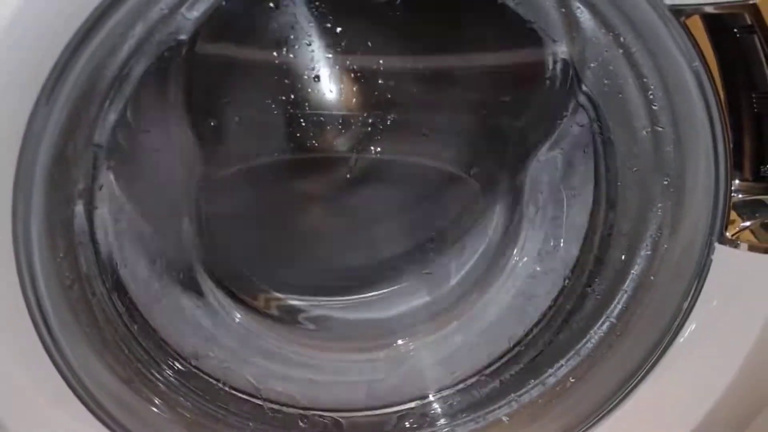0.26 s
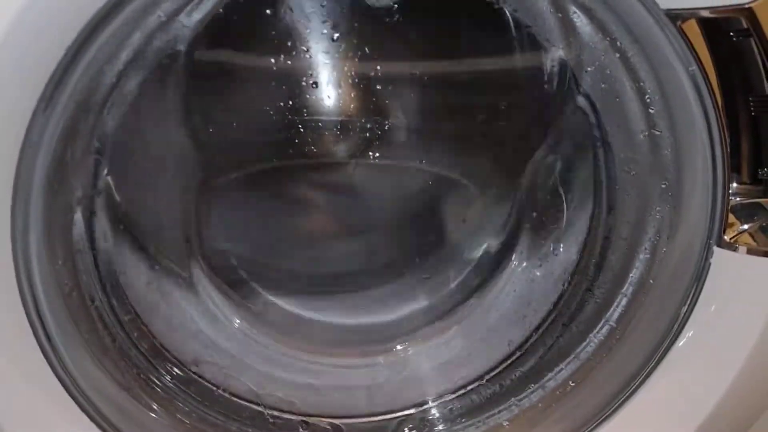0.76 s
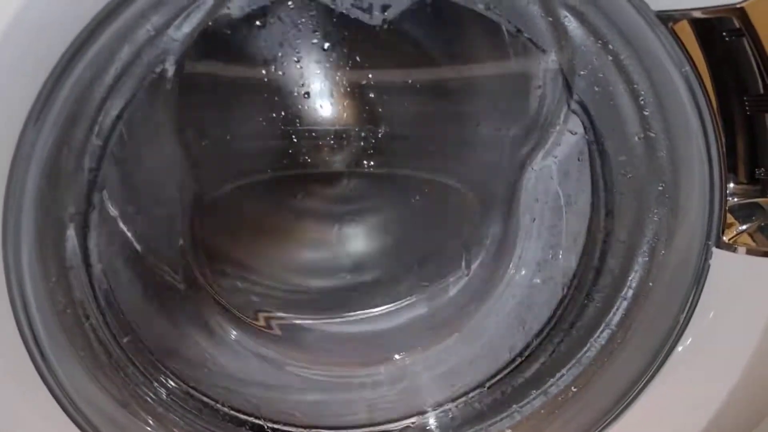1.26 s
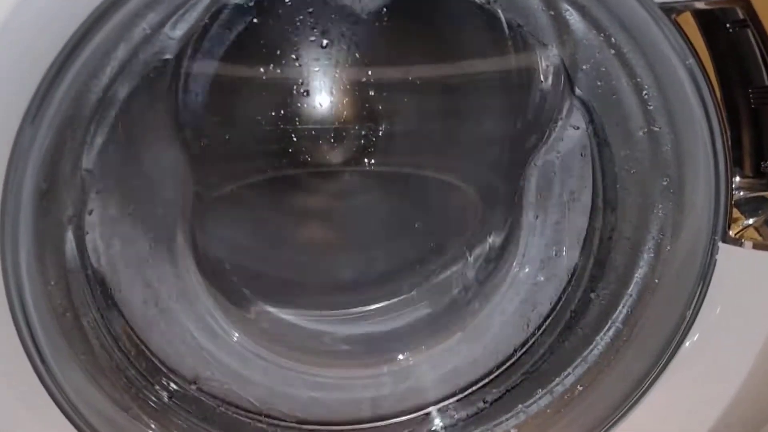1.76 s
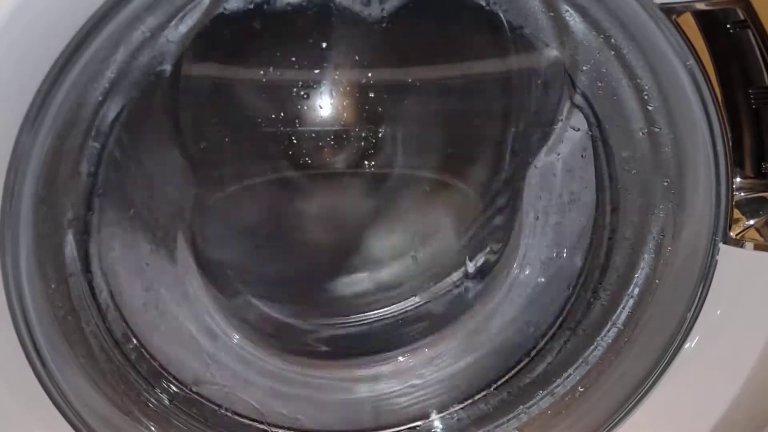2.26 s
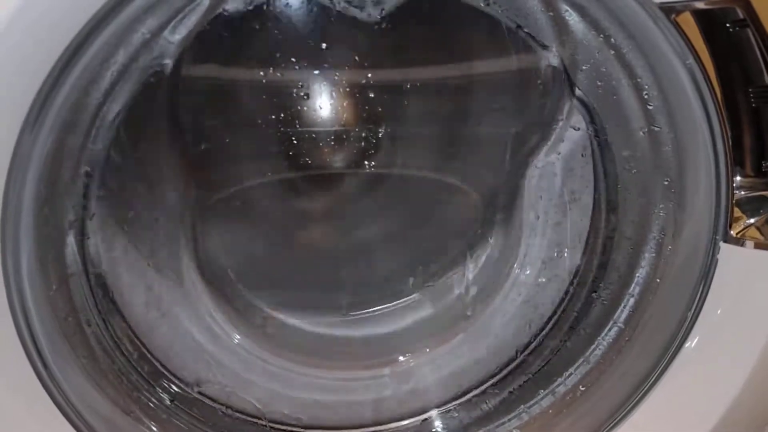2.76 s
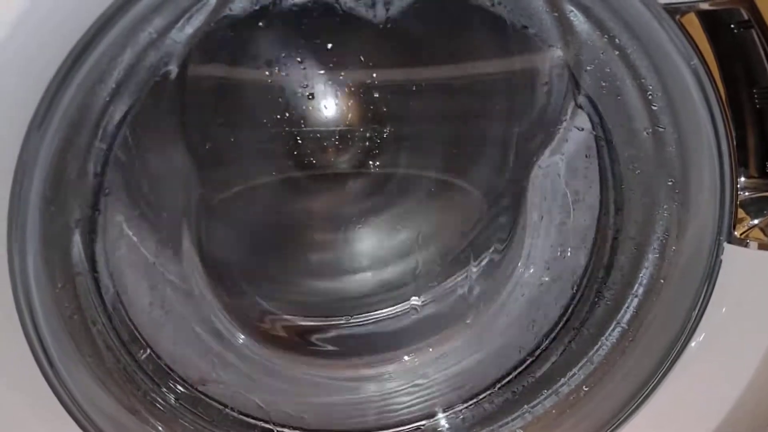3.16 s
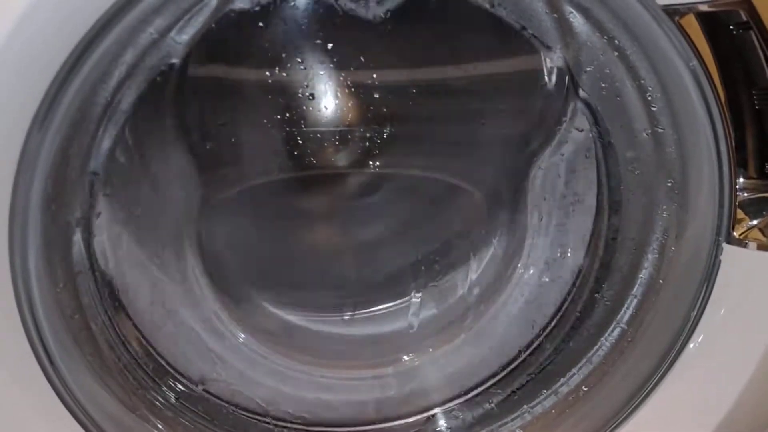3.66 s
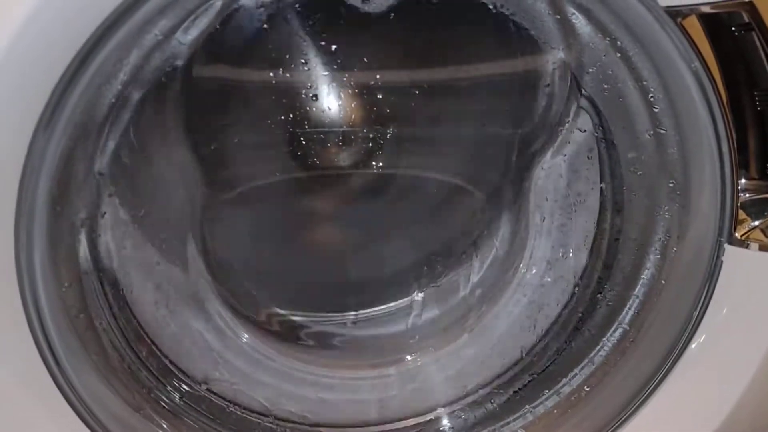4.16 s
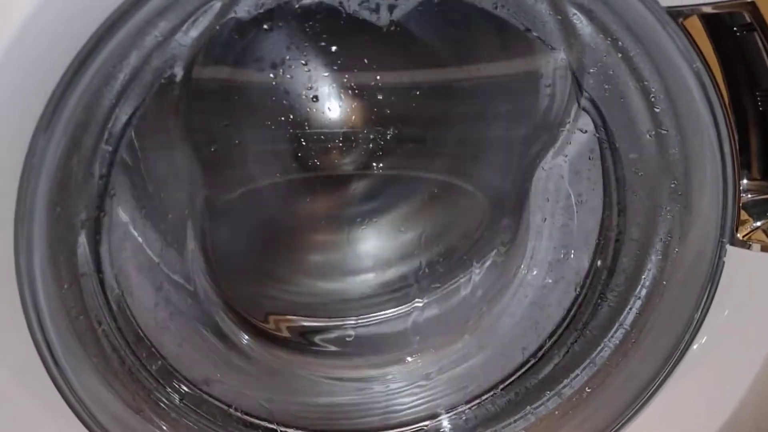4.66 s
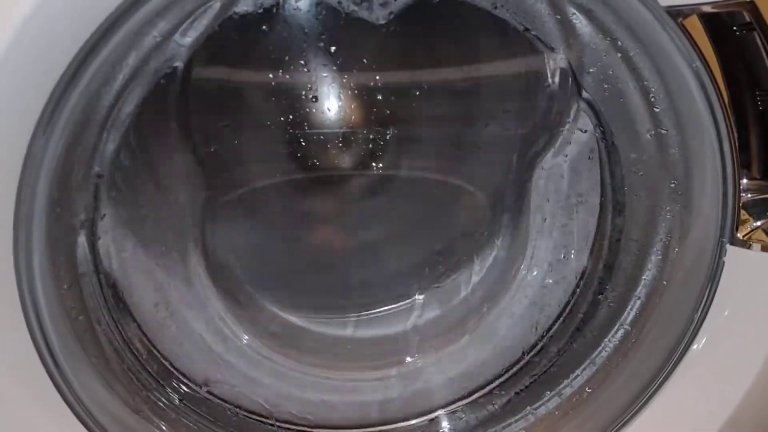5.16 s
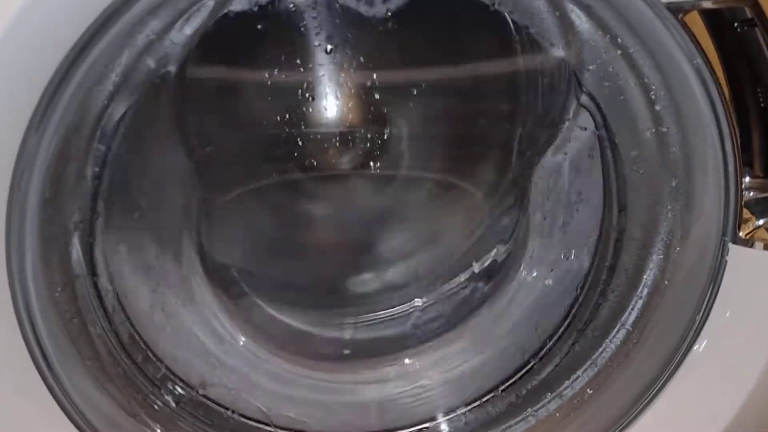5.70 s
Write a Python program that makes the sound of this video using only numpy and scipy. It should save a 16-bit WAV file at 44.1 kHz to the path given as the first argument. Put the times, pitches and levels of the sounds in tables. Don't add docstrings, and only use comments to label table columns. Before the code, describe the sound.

A front-loading washing machine spins up in a home, heard very close to the door glass in stereo. At 0 s the motor is already whining around 2 kHz, slightly juddering, and climbs smoothly, fastest in the first second. It nears its peak around 1.5-2 s, then eases down a touch and holds steady from about 3.75 s to the end near 5.9 s. Shrill overtones and crisp, fizzing brush hiss sit above; the whine's loudness shifts unevenly as it rises. Below, a wet laundry rumble swells early and then gradually fades, with cabinet vibration and mains hum, pulsing six to seven times a second with the lopsided drum. Sloshing water builds over the first couple of seconds, in irregular quick surges. At about 2.5 s fine spray breaks out, hissing onward, with short spurts near 2.8, 3.25, 3.65, 4.3 and 5.55 s. The machine is still spinning at the end.

```python
import sys
import numpy as np
from scipy import signal
from scipy.fft import rfft, irfft, next_fast_len
from scipy.io import wavfile
from scipy.ndimage import uniform_filter1d, map_coordinates

SR = 44100
rng = np.random.default_rng(int(sys.argv[2]) if len(sys.argv) > 2 else 0)


def volts(x):
    e = np.asarray(x, float) / 20
    return 10 ** e


def pcm_store(signal):
    levels = np.round(np.clip(np.atleast_2d(signal), -1, 1) * 32767)
    wavfile.write(sys.argv[1], SR, levels.astype(np.int16).T)


N = 261513
TIME_S = np.arange(N) / SR

# (t/s, bar rate/Hz), the bar rate being copper bars passing a brush per second
SPEED = [(0.0, 2074.8), (0.2, 2213.7), (0.4, 2317.2), (0.6, 2409.2), (0.8, 2502.0), (1.0, 2561.1),
         (1.2, 2617.2), (1.4, 2647.4), (1.6, 2669.2), (1.8, 2677.8), (2.0, 2678.4), (2.35, 2674.2),
         (2.7, 2657.7), (3.75, 2614.5), (5.93, 2614.0)]
STAGES_S = [1.0, 2.4, 3.7]

# (f/Hz, level/dB)
RUMBLE = [(35, -5), (60, 0), (110, 4), (160, 1), (250, 2.5), (320, 6.5), (360, -22), (450, -1), (600, -7)]
# (f/Hz, level/dB)
SLOSH = [(200, -1.5), (340, 1), (356, -3), (392, -3.5), (560, -3), (609, 0), (667, -5), (795, 2.5),
         (899, 0.5), (1020, -7), (1150, -5), (1510, -13), (1600, -14), (2080, -58), (3520, -120)]
# (f/Hz, level/dB)
SPRAY = [(1400, -60), (1540, -42), (1700, 14), (1950, 7), (2150, 9), (2500, 10.5), (3000, 7.5), (3700, 0.5),
         (4400, 6), (4900, -6), (5600, -110)]
# (t/s, level over the mean/dB)
SLAPS = [(.15, -4), (.34, 0), (.84, 0), (1.051, 5), (1.2, 1.5), (1.44, -3.5), (1.5, 4.5), (1.62, 0),
         (1.88, -4), (1.95, 5.5), (2.22, 0.5), (2.37, 1.5), (2.47, -2), (2.53, 2.5), (2.8, 4), (2.96, 3),
         (3.2, 1), (3.27, 2.5), (3.4, 4), (3.5, -1.5), (3.58, 1.5), (3.8, -3), (4.17, 3.5), (4.4, 0),
         (4.71, -4)]
# (t/s, level over the mean/dB)
SPURTS = [
    (2.8, 3.1),
    (3.25, 3.3),
    (3.65, 4),
    (4.3, 2.3),
    (5.55, 2.2),
]
# (f/Hz, likeness from -1 to 1)
LIKENESS = [(60, 0.97), (130, 0.9), (290, 0.68), (640, 0.22), (1410, -0.09), (3100, -0.07), (6820, -0.07),
            (15000, -0.05)]

# (multiple of drum turn, rising level/dB, overshoot level/dB, settled level/dB)
DRUM = [(9, -47.7, -40.9, -45.6), (11, -48.4, -49.3, -48.3), (12, -62.0, -53.4, -57.8),
        (13, -51.0, -50.9, -47.2), (18, -55.3, -48.3, -48.4), (19, -51.9, -41.8, -43.6),
        (20, -52.8, -48.9, -46.1), (21, -52.9, -56.5, -48.9), (23, -46.8, -47.4, -54.2),
        (24, -49.9, -53.7, -39.3), (25, -56.1, -51.9, -50.9), (26, -60.2, -51.1, -47.3),
        (27, -54.6, -47.9, -43.5), (28, -57.6, -50.9, -54.6), (31, -57.8, -52.7, -57.6),
        (32, -62.2, -55.7, -50.4), (36, -56.2, -47.9, -50.1), (37, -57.6, -46.3, -53.0),
        (38, -57.6, -55.7, -49.9), (43, -59.5, -48.8, -51.5), (46, -55.2, -58.2, -48.7),
        (47, -59.8, -51.3, -54.5), (48, -58.2, -46.7, -47.5), (49, -57.5, -50.5, -53.4),
        (50, -53.8, -54.9, -47.5), (59, -66.5, -52.1, -60.2), (60, -59.8, -55.9, -50.7),
        (61, -60.4, -60.4, -54.5)]
# (multiple of rotor turn, rising level/dB, overshoot level/dB, settled level/dB)
ROTOR = [(1, -43, -61.5, -70), (3, -77, -71, -47)]
# (f/Hz, rising level/dB, overshoot level/dB, settled level/dB)
MAINS = [(100, -49, -50, -45), (200, -56, -51, -44), (300, -47, -48, -41.5), (400, -57, -55, -54)]

# (f/Hz, level/dB)
BRUSH = [(3500, -43), (4800, -11.5), (5400, -2.5), (5750, -12), (6150, -21), (6500, -6.5), (7500, -4.5),
         (8500, -7.5), (9700, -2), (11000, -5), (12200, -12.5), (13100, 0), (13900, -13), (15100, -8),
         (15700, -14), (19000, -4)]
# (bar rate/Hz, left level/dB, right level/dB)
BAR_PATH = [(2180, -38, -42), (2198, -28.5, -42), (2330, -48.5, -35.5), (2500, -30, -31),
            (2512, -30.5, -29), (2645, -37.5, -32), (2612, -40, -33), (2687, -27, -30.5)]
# (bar rate/Hz, level at 1.5 times/dB, level at twice/dB)
OVERTONE_PATH = [(2140, -57, -43), (2180, -54, -37.5), (2230, -55, -46.5), (2430, -72, -49),
                 (2564, -75, -44), (2506, -64.5, -38.5), (2650, -55, -37.5), (2700, -40, -43)]
# (bar rate/Hz, right minus left level/dB)
TRIPLE_PAN = [(2560, -0.5), (2614, -3), (2640, -1), (2678, 2)]
# (multiple of rotor turn, level under strongest/dB, right minus left level/dB, extra start level/dB)
UPPER = [(45, -9.5, -.6, -8), (54, 0, -.6, -4), (63, -6.5, -1.4, -11), (72, -2.2, 1.2, 0),
         (81, -13.5, -1.1, -2), (90, -10, -.7, 2), (99, -16, 1.8, -2), (108, -15, 1.8, 7), (117, -17, 0, 0),
         (126, -18, 0, 2)]
BAR_SWELL = [
    [3.1],
    [0],
]
OCTAVE_SWELL = [
    [-.7],
    [-.7],
]
UPPER_SWELL = [
    [2.7],
    [1.2],
]

BARS, BARS_PER_DRUM_TURN = 18, 391.7
SETTLED_HZ = 2614
TUG_HZ, TUG_ANGLE = 7.0, -1.88


def rms_one(x):
    return x / np.sqrt(np.mean(np.abs(x) ** 2) + 1e-20)


def read_columns(rows, at):
    first, *columns = np.transpose(rows)
    return [np.interp(at, first, column) for column in columns]


def left_right(left_db, right_db):
    return np.array([[left_db], [right_db]])


def bumps(events, width_s):
    return sum(db * np.exp(-.5 * ((TIME_S - s) / width_s) ** 2) for s, db in events)


def waver(width_hz, channels=1):
    step = 16
    r = np.exp(-2 * np.pi * step * width_hz / SR)
    raw = rng.standard_normal((2, channels, N // step + 4002))
    slow = signal.lfilter([1], [1, -2 * r, r * r], raw[0] + 1j * raw[1])
    slow = rms_one(slow[:, 4000:])
    at = np.arange(N) / step
    return np.array([np.interp(at, np.arange(len(c)), c) for c in slow])


def coloured(spectrum, size=N):
    size = next_fast_len(size)
    log_hz = np.log(np.arange(size // 2 + 1) * SR / size + 1)

    def read(table, **ends):
        hz, value = np.transpose(table)
        return np.interp(log_hz, np.log(hz), value, **ends)

    mid, side = rfft(rng.standard_normal((2, size))) * volts(read(spectrum, left=-80, right=-80))
    alike = np.clip(read(LIKENESS), -1, 1)
    mid = mid * np.sqrt(1 + alike)
    side = side * np.sqrt(1 - alike)
    return rms_one(irfft([mid + side, mid - side], size))


def angles(bar_hz):
    drum = 2 * np.pi * np.cumsum(bar_hz) / SR / BARS_PER_DRUM_TURN
    tugged = bar_hz + TUG_HZ * np.cos(drum + TUG_ANGLE)
    tugged += 1.2 * np.real(waver(1.5)[0])
    tugged += 9 * np.exp(-TIME_S / .7) * np.real(waver(40)[0])
    return drum, 2 * np.pi * np.cumsum(tugged) / SR / BARS


def water_levels():
    slaps_db = bumps(SLAPS, width_s=0.022)
    rumble_db = -31.5 - 3.5 * np.exp(-TIME_S / 0.27) - 0.98 * TIME_S
    rumble_db += 0.7 * slaps_db - np.real(waver(8.7)[0])
    slosh_db = -36.5 - 10.5 * np.exp(-TIME_S / 1.33) + slaps_db
    since = TIME_S - 2.52
    opening = np.clip(since / 0.078 + .5, 0, 1)
    gush_db = opening * (3.5 + 2 * np.exp(-np.maximum(since, 0) / 1.7))
    gush_db += bumps(SPURTS, width_s=0.032)
    return rumble_db, slosh_db, -46 + gush_db + 0.37 * slaps_db


def water(drum, rumble_db, slosh_db, spray_db):
    swell = np.cos(drum - 2.1)
    rumble_db = rumble_db - 3.0 + 0.93 * swell + left_right(-1.2, 1.2)
    slosh_db = slosh_db + 3.5 + 1.37 * swell + 1.4 * np.real(waver(23)) + left_right(-.6, .6)
    spray_db = spray_db + 0.34 * swell + 2.06 * np.real(waver(6.6))
    rumble = volts(rumble_db) * coloured(RUMBLE)[:, :N]
    slosh = volts(slosh_db) * coloured(SLOSH)[:, :N]
    spray = volts(spray_db) * coloured(SPRAY)[:, :N]
    return rumble + slosh + spray


def cabinet(drum, rotor):
    lines = [(k * drum, k * SETTLED_HZ / BARS_PER_DRUM_TURN, db) for k, *db in DRUM]
    lines += [(k * rotor, k * SETTLED_HZ / BARS, db) for k, *db in ROTOR]
    lines += [(2 * np.pi * hz * TIME_S, hz, db) for hz, *db in MAINS]
    out = np.zeros((2, N))
    for phase, hz, stages_db in lines:
        loose = np.clip(hz / 1000, 0, 1)
        lag = hz / 700 * rng.normal(0, 1) * np.array([[.5], [-.5]])
        core = np.sqrt(1 - loose) * np.exp(1j * rng.uniform(0, 2 * np.pi)) + np.sqrt(loose) * waver(0.93)
        level = volts(np.interp(TIME_S, STAGES_S, stages_db))
        out += level * np.sqrt(2) * np.real(core * np.exp(1j * (phase + lag)))
    run_up_db = np.interp(TIME_S, [0, .8], [-8, 0])
    return out * volts(run_up_db + left_right(-1.6, 1.4))


def panel(x):
    panel_hz, width_hz, ring_db = 147.4, 7.7, 3
    r, w = np.exp(-np.pi * width_hz / SR), 2 * np.pi * panel_hz / SR
    ring = signal.lfilter(np.array([1, 0, -1]) * (1 - r * r) / 2, [1, -2 * r * np.cos(w), r * r], x)
    return x + volts(ring_db) * ring


def brushes(rotor, upper_db):
    at = rotor / (2 * np.pi) * BARS / SETTLED_HZ * SR
    hiss = coloured(BRUSH, size=N + 8000)
    hiss = np.array([map_coordinates(c, [at], order=3) for c in hiss])
    multiples = np.arange(19, 130)
    turn = np.linspace(0, 2 * np.pi, 4097)
    hz, db = np.transpose(BRUSH)
    heights_db = np.interp(np.log(multiples * SETTLED_HZ / BARS), np.log(hz), db)
    heights = volts(heights_db + rng.normal(0, 4, (2, len(multiples))))
    phases = rng.uniform(0, 2 * np.pi, heights.shape)
    waves = np.cos(multiples[:, None] * turn + phases[..., None])
    uneven = rms_one(np.sum(heights[..., None] * waves, axis=1))
    lines = np.array([np.interp(rotor % (2 * np.pi), turn, c) for c in uneven])
    housing = signal.butter(5, 5040, "high", fs=SR, output="sos")
    brush = signal.sosfilt(housing, hiss + volts(-9) * lines)
    effort_db = uniform_filter1d(upper_db, size=SR, mode="nearest")
    run_up_db = np.interp(TIME_S, [0, 1.3], [-3, 0])
    return volts(effort_db + run_up_db) * brush


def partial(multiple, rotor, drum, steady, throb_db, skirt_db, swell=None):
    start = rng.uniform(0, 2 * np.pi) + np.array([[np.pi / 2], [0]])
    if swell is None:
        lag = rng.uniform(0, 2 * np.pi, (2, 1))
    else:
        lag = TUG_ANGLE + np.array(swell)
    flutter = waver(7 + .4 * multiple, channels=2)
    flutter = rms_one(flutter - uniform_filter1d(flutter, size=SR // 7))
    core = np.sqrt(steady) * np.exp(1j * start) + np.sqrt(1 - steady) * flutter
    core = core * volts(throb_db * np.cos(drum + lag))
    core = core + volts(skirt_db) * waver(110, channels=2)
    return np.sqrt(2) * np.real(core * np.exp(1j * multiple * rotor))


def whine(rotor, drum, left_db, right_db, half_db, octave_db, upper_db, triple_pan_db):
    steady = np.array([[.8], [.92]])
    bar = partial(BARS, rotor, drum, steady, throb_db=1.8, skirt_db=-18, swell=BAR_SWELL)
    out = volts([left_db, right_db]) * bar
    out *= 1 + .14 * np.cos(2 * np.pi * 100 * TIME_S)
    out += volts(half_db) * partial(27, rotor, drum, steady=.5, throb_db=2.5, skirt_db=-12)
    octave = partial(36, rotor, drum, steady=.77, throb_db=2.2, skirt_db=-11, swell=OCTAVE_SWELL)
    out += volts(octave_db + left_right(-2.5, 1.8)) * octave
    pulling = np.interp(TIME_S, [0, 1.3], [1, 0])
    for multiple, db, pan_db, start_db in UPPER:
        swell = None
        if multiple == 3 * BARS:
            pan_db, swell = triple_pan_db, UPPER_SWELL
        level = volts(upper_db + db + start_db * pulling + pan_db * left_right(-.5, .5))
        out += level * partial(multiple, rotor, drum, steady=.68, throb_db=1.5, skirt_db=-9, swell=swell)
    pull_db = np.interp(TIME_S, [0, .8, 1.5], [-47, -55, -61])
    return out + volts(pull_db) * partial(17, rotor, drum, steady=.5, throb_db=1.5, skirt_db=-12)


def scene():
    bar_hz = uniform_filter1d(*read_columns(SPEED, TIME_S), size=4000, mode="nearest")
    drum, rotor = angles(bar_hz)
    upper_db = -35 + 0 * TIME_S
    paths = read_columns(BAR_PATH, bar_hz) + read_columns(OVERTONE_PATH, bar_hz)
    background = water(drum, *water_levels()) + panel(cabinet(drum, rotor))
    motor = whine(rotor, drum, *paths, upper_db, *read_columns(TRIPLE_PAN, bar_hz))
    return background + brushes(rotor, upper_db) + motor


def band_limit(x):
    return signal.sosfilt(signal.butter(12, 15730, fs=SR, output="sos"), x)


def record(dry):
    return band_limit(dry)


dry = scene()
out = record(dry)
pcm_store(out)
```